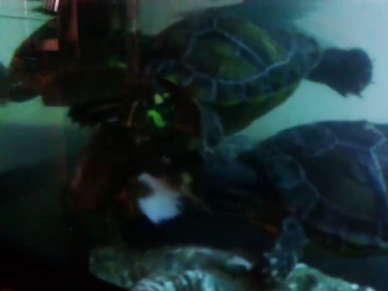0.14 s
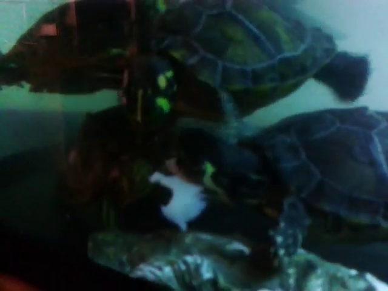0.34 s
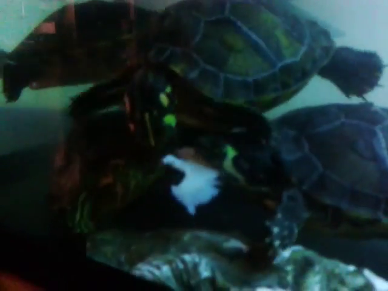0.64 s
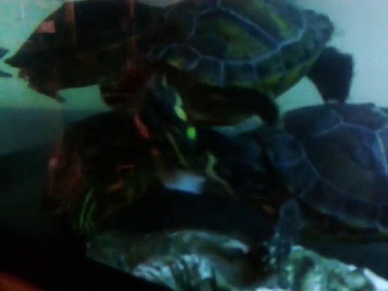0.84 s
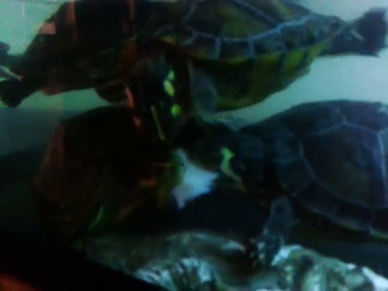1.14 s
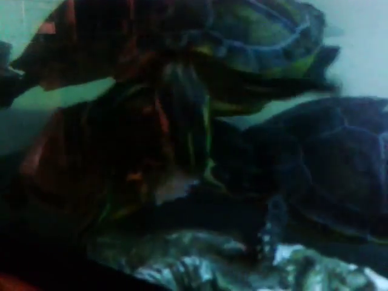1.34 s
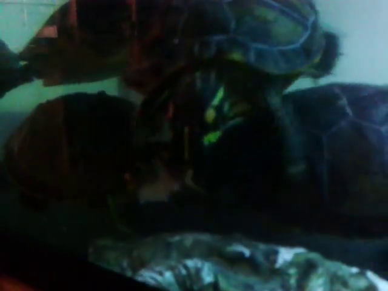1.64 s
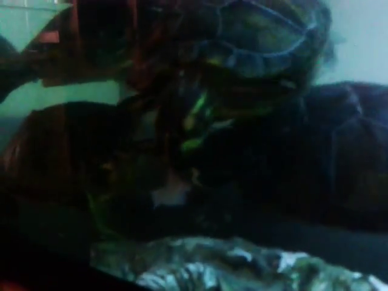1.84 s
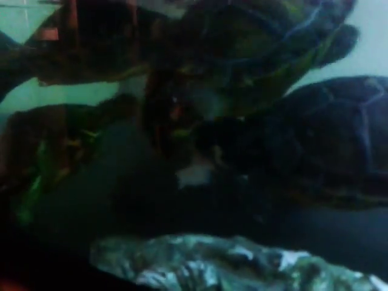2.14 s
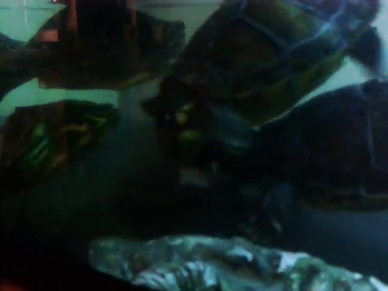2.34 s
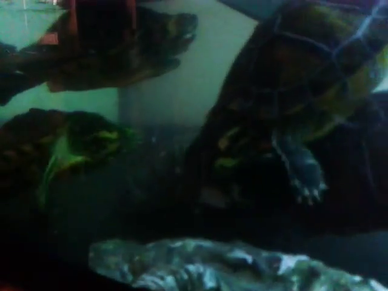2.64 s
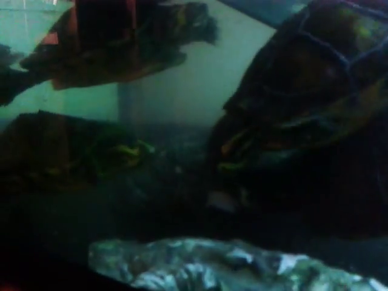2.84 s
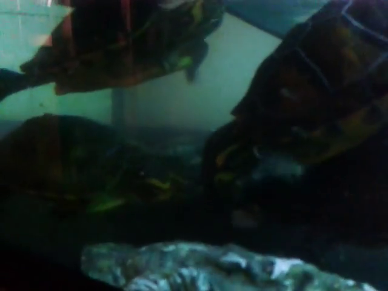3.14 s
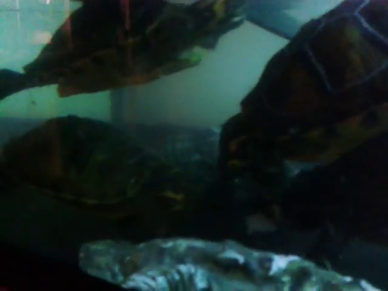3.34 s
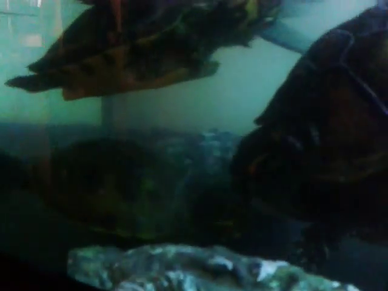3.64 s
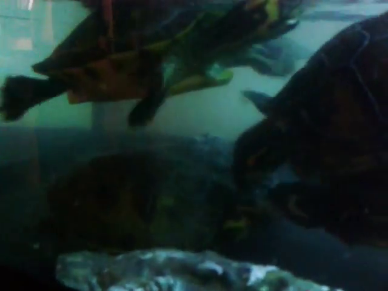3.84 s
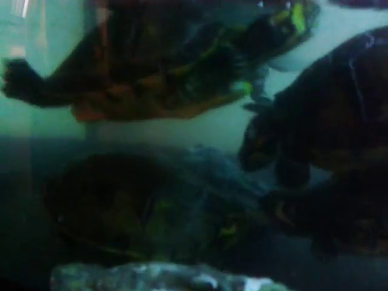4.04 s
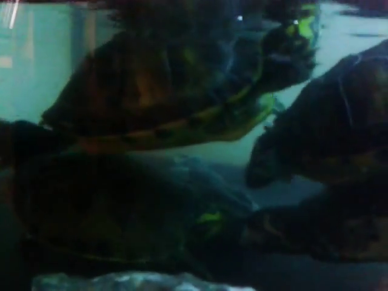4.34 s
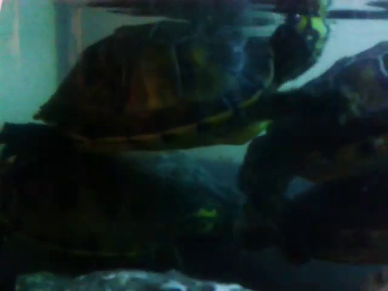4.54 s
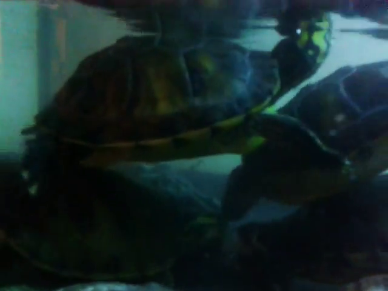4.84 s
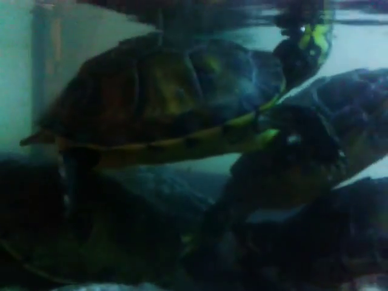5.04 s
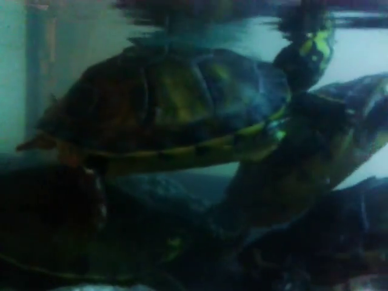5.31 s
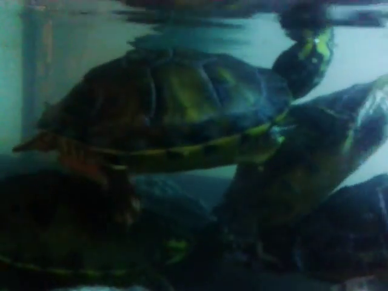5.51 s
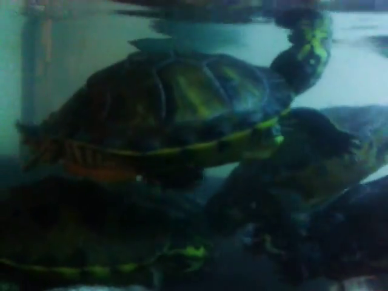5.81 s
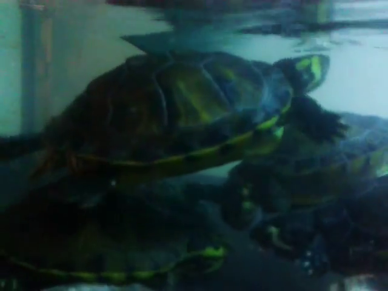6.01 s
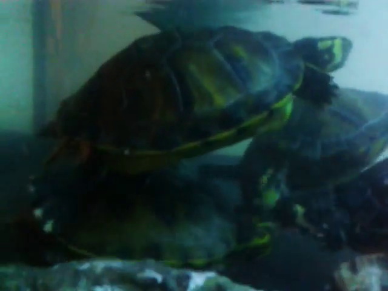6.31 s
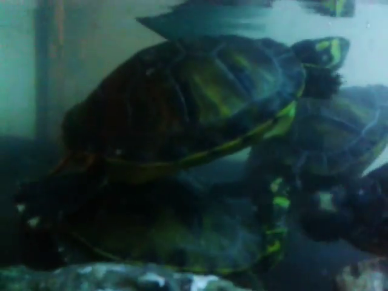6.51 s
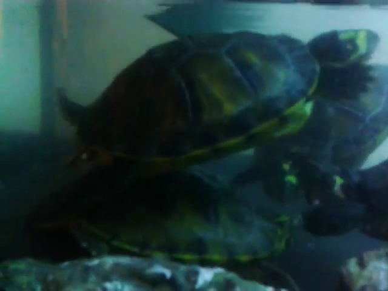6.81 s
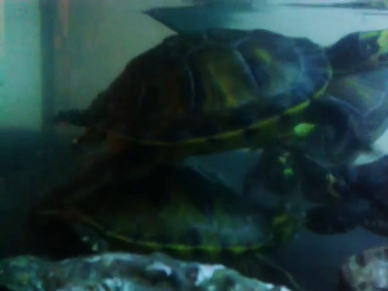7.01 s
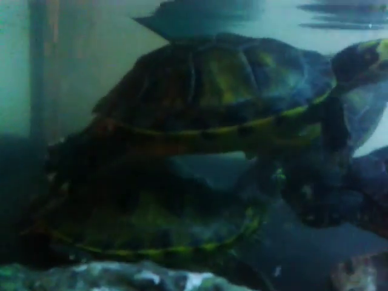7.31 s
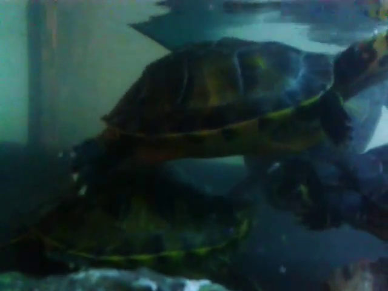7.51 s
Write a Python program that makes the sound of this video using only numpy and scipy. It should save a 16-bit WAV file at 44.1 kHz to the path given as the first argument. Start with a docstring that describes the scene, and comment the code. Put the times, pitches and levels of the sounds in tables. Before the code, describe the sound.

Close irregular taps, scrapes and clicks of turtle shells and claws on tank glass, two loud knocks echoing briefly, faint hiss around them.

```python
"""In a quiet room, turtles jostle in a glass aquarium close to the microphone.
Claws rasp (bursts of tiny clicks) and shells drag (low noise); light taps are short thuds of falling pitch.
Two hard knocks set the whole tank ringing (a sum of fading tones) and the room answers with noise-like echo.
Narrow bands of noise make rubs and fill out a tap and the knocks; a few squeaks are wavering tones.
A noise suppressor lets a faint hiss swell with each sound and sink after it."""
import sys
import numpy as np
from scipy import signal
from scipy.fft import rfft, irfft
from scipy.io import wavfile
from scipy.ndimage import uniform_filter1d

SR = 44100
rng = np.random.default_rng(int(sys.argv[2]) if len(sys.argv) > 2 else 0)


def output_pcm(signal):
    """Save a mono or channel-first signal as 16-bit PCM at the path in sys.argv[1].

    Samples are clipped to [-1, 1] before scaling.
    """
    pcm = np.clip(np.atleast_2d(signal).T, -1, 1) * 32767
    wavfile.write(sys.argv[1], SR, np.round(pcm).astype(np.int16))


N = 337806
TIME = np.arange(N) / SR
RING_TIME = np.arange(SR // 2) / SR  # half a second, the longest that one tap or knock lasts before its echo

# A t60 is the time in which a sound falls by 60 dB. Spectra give only a shape; the level is set elsewhere.
# The quiet room. Each row: frequency in Hz, relative strength in dB per Hz.
ROOM_TONE = [(20, -20), (45, -14.5), (85, -1), (125, 1), (200, -4.5), (320, -15.5), (600, -20),
             (1200, -32.5), (3000, -27.5), (9000, -51)]
# Microphone hiss. Each row: frequency in Hz, relative strength in dB per Hz.
HISS = [(30, -2.5), (300, 8.5), (1000, 2.5), (3000, 1), (5500, 4), (7800, 1), (8270, 4), (8700, 0.5),
        (11000, 1), (16000, 2.5)]
# How restless the turtles are. Each row: time in seconds, activity in dB (its contrast is stretched later).
RESTLESS = [(0.0, -74), (1.06, -70), (1.21, -66), (1.36, -65), (1.64, -73), (2.0, -74), (2.41, -60.5),
            (2.51, -67), (3.45, -73.5), (3.68, -61), (4.24, -69), (4.5, -66), (4.62, -63), (5.5, -70),
            (5.86, -64.5), (5.99, -67.5), (7.37, -76.5), (7.65, -78)]
# The rasp of a claw. Each row: frequency in Hz, relative strength in dB.
RASP = [(300, -42.5), (1100, -19.5), (1500, -11), (1900, -15.5), (2600, -15), (3300, -10.5), (4050, -10),
        (4550, 3), (5300, 4.5), (6300, 1.5), (7400, -4.5), (8500, -8.5), (10000, -20), (16000, -36)]
# The drag of a shell. Each row: frequency in Hz, relative strength in dB.
DRAG = [(60, -33.5), (170, 4), (280, 5.5), (450, 2), (650, -2), (900, -8), (1500, -20.5), (3000, -31),
        (8000, -44)]
# The room's echo. Each row: frequency in Hz, t60 in seconds.
ECHO = [(150, 0.63), (500, 0.37), (1500, 0.39), (5000, 0.38), (10000, 0.64)]
# Light contacts stay mostly in the glass. Each row: frequency in Hz, echo against the direct sound in dB.
LIGHT_ECHO = [(200, -10.0), (700, -34), (5000, -12.5)]
# How strongly a hard knock radiates into the room. Each row: frequency in Hz, relative strength in dB.
KNOCK_ECHO = [(200, -11), (450, -12.5), (750, -7), (1300, -16), (3000, -7.5), (5500, -3.5), (8000, 3.5)]
# Modes of the tank. Each row: frequency in Hz, t60 in seconds,
# relative level in dB when struck with the shell edge, and the same when struck flat on.
TANK_MODES = [(189, 0.5, -49, -58), (359, 0.13, -38, -40), (444, 0.15, -37, -39), (487, 0.11, -32, -19),
              (552, 0.17, -40, -34), (600, 0.12, -42, -34), (691, 0.26, -38, -48), (720, 0.24, -40, -40),
              (777, 0.26, -40, -36), (861, 0.15, -51, -35), (980, 0.14, -45, -32), (1049, 0.23, -51, -37),
              (1176, 0.21, -50, -38), (1270, 0.13, -48, -25), (1309, 0.19, -47, -29),
              (1553, 0.19, -43, -42), (1609, 0.17, -42, -43), (1657, 0.2, -43, -49), (1702, 0.12, -44, -36),
              (1776, 0.21, -53, -43), (1886, 0.24, -51, -45), (2171, 0.19, -55, -36),
              (2356, 0.17, -51, -50), (2686, 0.13, -43, -48), (2863, 0.13, -42, -46),
              (2968, 0.13, -39, -50), (3067, 0.13, -45, -45), (3171, 0.13, -42, -49),
              (3347, 0.13, -45, -53), (3682, 0.13, -56, -52)]
# A hard contact on glass. Each row: frequency in Hz, relative strength in dB.
CRACK = [(150, -36), (350, -12), (600, -2.5), (1300, 5.5), (1900, -4.5), (2300, -2), (3000, -11.5),
         (3900, -17.5), (4500, -9.5), (5500, -11), (6600, -24), (9000, -43), (16000, -71.5)]
# The first snap of a claw on the pane. Each row: frequency in Hz, relative strength in dB.
TICK = [(1000, -21.5), (3500, -16), (4600, -12.5), (6000, 7.5), (7000, -12), (8500, -19.5), (11000, -32)]
# Taps of shell and claw. Each row: start in seconds, thud level in dB, final thud pitch in Hz, thud t60 in
# seconds, tick level in dB, shake given to the tank in dB, crack level in dB.
TAPS = [(0.303, -42, 326, 0.014, -57, -26.5, -45), (0.7071, -46, 578, 0.126, -52, -32, -62),
        (1.016, -70, 496, 0.026, -32.5, -34, -62), (1.238, -52, 790, .04, -56, -29, -53),
        (1.475, -42, 440, 0.074, -65, -16, -32.5), (1.578, -49.5, 540, 0.097, -60, -29.5, -49),
        (2.2043, -36, 396, 0.072, -35, -14.5, -41), (2.3581, -31.5, 610, 0.021, -22, -37, -45.5),
        (2.961, -34.5, 590, 0.0078, -44, -24.5, -37), (3.1818, -34, 307, 0.047, -58.5, -30, -35),
        (3.186, -36, 900, 0.014, -58, -40, -48), (3.249, -43.5, 700, 0.0124, -60, -37.5, -58),
        (3.405, -49, 706, 0.0037, -25.5, -32, -42.5), (3.557, -45, 515, 0.013, -30, -19.5, -43.5),
        (3.729, -52, 636, 0.06, -44, -40, -41), (3.8519, -45.5, 510, 0.077, -40, -20.5, -38.5),
        (3.914, -49, 650, .004, -38.5, -39, -36.5), (4.183, -41, 553, 0.039, -28.5, -23, -31.5),
        (4.6902, -24.5, 450, 0.0025, -32, -29, -39.5), (4.891, -62.5, 700, 0.0068, -39, -35.5, -47),
        (5.9825, -36, 435.4, 0.027, -27, -30, -45), (6.212, -24.5, 415, 0.0067, -22, -29, -36),
        (6.2513, -12, 442, 0.00463, -13.5, -37.5, -30), (7.239, -44.5, 495.6, .021, -45, -36, -38.5),
        (7.307, -49, 466, .02, -52, -43, -50), (7.5518, -37.5, 380, 0.018, -28, -28, -53),
        (7.576, -46, 605, 0.0049, -58, -40, -55)]
# Firm strokes of claw and shell. Each row: start in seconds, length in seconds, rasp level in dB,
# rasp brightness in dB per octave, low drag level in dB.
STROKES = [(0.621, 0.047, -49.5, -1, -63), (0.694, 0.028, -58.5, -3, -60.5),
           (1.011, 0.0285, -50, -2, -62.5), (1.05, 0.084, -60, 0, -62), (1.105, 0.018, -40.5, 2.5, -70.5),
           (1.23, 0.024, -55, -4, -59), (1.316, 0.08, -52, 5, -68), (1.993, 0.029, -51.5, 4, -63.5),
           (2.056, 0.082, -79, -2, -59), (2.38, 0.022, -36.5, 5.5, -66), (2.605, 0.012, -52, -6.5, -65.5),
           (2.743, 0.097, -52, 1, -66), (3.045, 0.0068, -50.5, 3, -73), (3.08, 0.045, -50, 0, -64),
           (3.477, .047, -43.5, 1, -61.5), (3.667, 0.029, -51.5, -4, -69),
           (3.702, 0.0062, -38.5, -6.5, -75), (3.716, 0.025, -46, -11.5, -72.5),
           (3.744, 0.15, -55, -10, -59), (4.482, 0.065, -51, -6.5, -67), (4.572, 0.048, -46.5, -3.5, -65.5),
           (4.628, 0.052, -45.5, -6.5, -74), (4.986, 0.042, -57.5, 2, -70), (5.059, .045, -59.5, -6, -53.5),
           (5.581, 0.1, -55.5, 2.5, -69), (5.652, 0.075, -56, -4.5, -69.5),
           (5.784, 0.085, -53.5, -4.5, -64), (6.002, 0.08, -59.5, 0, -82), (6.202, 0.052, -60, -6, -53.5),
           (6.278, 0.092, -59, -1, -63.5)]
# Narrow noise bands: rubs on the glass, plus bands of the tap at 2.2 s, of the first knock,
# and a faint low ring after the second. Each row: start in seconds, length in seconds, level in dB,
# centre in Hz, width in Hz.
NARROW_BANDS = [(1.089, 0.055, -66, 1530, 200), (2.195, 0.065, -53, 740, 260), (2.23, .36, -60, 193, 45),
                (2.359, 0.022, -37.5, 3000, 696), (2.361, 0.0433, -45.5, 1650, 180),
                (3.479, 0.04, -54, 3460, 400), (3.665, 0.12, -57, 626, 100),
                (4.572, 0.11, -58.5, 3430, 600), (5.161, 0.68, -69, 260.6, 24.8),
                (5.81, 0.029, -59, 3387, 347), (6.63, 0.315, -59, 596, 257)]
# Hard knocks. Each row: start in seconds, gain on the tank's ring in dB, spot struck (0 shell edge, 1 flat on),
# crack level in dB, pitch in Hz that sets how bright the crack is, clatter level in dB,
# clatter t60 in seconds, gain on the room echo in dB.
KNOCKS = [(2.3602, -1.5, 0, -16, 647, -28, 0.0354, 9), (5.117, 0, 1, -7, 1428, -17.5, .035, -2)]
# Squeaks of a claw on wet glass, one list each. Each row: time in seconds, pitch in Hz, level in dB.
SQUEAKS = [
    [(2.744, 1290, -60), (2.748, 1044, -51.5), (2.765, 1030, -63), (2.79, 1004, -65)],
    [(2.81, 750, -59), (2.828, 774, -63), (2.845, 1120, -62), (2.854, 1580, -50.5), (2.864, 1946, -54),
     (2.873, 2130, -63), (2.88, 2250, -66)],
    [(3.616, 8150, -66), (3.62, 8700, -42), (3.626, 9000, -53), (3.64, 9100, -64)],
]

THUD_START_HZ, GLIDE_S = 937, 0.0016  # every thud glides from the same pitch to its own
RING_DB, SKID_DB = -6.5, -34.5  # shares of a tap's shake
SKID_RISE_S, SKID_T60_S = .006, 0.64  # the shell skids on briefly after it lands
# Noise suppressor: where cutting begins, how steeply it cuts, how fast it closes, the bass it spares
OPEN_DB, CUT_DB_PER_DB, CLOSE_DB_PER_S, SPARED_BASS_HZ = -50, 0.69, 45.5, 210
EDGE_HZ = 17350  # upper band limit


def amp(db):
    """Turns decibels into gain."""
    return 10 ** (np.asarray(db) / 20)


def unit(x):
    """Scales a sound to rms 1."""
    return x / np.sqrt(np.mean(x ** 2) + 1e-20)


def read(points, hz):
    """Reads a table of frequency and value, with straight lines over log frequency."""
    f, value = np.transpose(points)
    return np.interp(np.log(hz + 1), np.log(f + 1), value)


def add(mix, s, sound):
    """Mixes a sound in at time s, in seconds."""
    part = mix[max(round(s * SR), 0):][:len(sound)]
    part += sound[:len(part)]


def dying(t60):
    """Envelope that falls 60 dB in t60 seconds."""
    return amp(-60 * RING_TIME / max(t60, 1e-3))


def coloured(x, spectrum):
    """Gives noise a spectrum, at rms 1."""
    hz = np.fft.rfftfreq(len(x), 1 / SR)
    return unit(irfft(rfft(x) * amp(read(spectrum, hz)), len(x)))


def click(spectrum, tilt_db=0, centre_hz=5500, size=2048):
    """Sharp click of peak 1 that starts at once; its spectrum tilts over an octave each side of the centre."""
    hz = abs(np.fft.fftfreq(size, 1 / SR))
    octaves = np.clip(np.log2((hz + 1) / centre_hz), -1, 1)
    log_gain = np.log(amp(read(spectrum, hz) + tilt_db * octaves))
    # minimum phase packs the energy at the start
    pulse = np.fft.ifft(np.exp(np.conj(signal.hilbert(log_gain)))).real[:size // 2]
    return pulse / abs(pulse).max()


def background(tone_db=-71.5, hiss_db=-59.0):
    """Low room tone and steady microphone hiss, both shaped noise."""
    tone = amp(tone_db) * coloured(rng.standard_normal(N), ROOM_TONE)
    hiss = amp(hiss_db) * coloured(rng.standard_normal(N), HISS)
    return tone + hiss


def rasp(count, bright_db, slips_per_s=1800, slip_spread_db=3, place_t60=0.038, place_db=-21):
    """Many tiny slips of a claw on the pane, each a click, at rms 1."""
    slips = rng.standard_normal(count) * (rng.random(count) < slips_per_s / SR)
    slips *= amp(slip_spread_db * np.minimum(rng.exponential(1, count), 4))
    # reflections from the edges of the pane give each place of contact its own resonances
    reflections = rng.standard_normal(len(RING_TIME)) * dying(place_t60)
    slips += amp(place_db) * signal.fftconvolve(slips, reflections)[:count]
    return unit(signal.fftconvolve(slips, click(RASP, bright_db))[:count])


def scuffing(rasp_db=-62, drag_db=-68, busy_db=-65, contrast=1.4, bright_db=-2, fitful_db=2):
    """Feet and shells brush the glass in fits and starts, and almost fall silent when the turtles rest."""
    fits = unit(uniform_filter1d(rng.standard_normal(N), size=3000))
    activity_db = np.interp(TIME, *np.transpose(RESTLESS))
    pressure = amp(contrast * (activity_db - busy_db) + fitful_db * fits)
    claws = amp(rasp_db) * rasp(N, bright_db)
    shells = amp(drag_db) * coloured(rng.standard_normal(N), DRAG)
    return pressure * (claws + shells)


def radiated(x):
    """Little deep bass comes through, and the water damps the highest treble."""
    return signal.sosfilt(signal.butter(4, [165, 9000], "bandpass", fs=SR, output="sos"), x)


def room(x, colour, build_s=0.01):
    """Diffuse echo, made of noise, that builds up quickly while each band dies at its own speed."""
    hz, t, bands = signal.stft(rng.standard_normal(len(RING_TIME)), SR, nperseg=256)
    bands = bands * amp(-60 * t / read(ECHO, hz)[:, None])
    tint = amp(read(colour, hz))[:, None]
    swell = 1 - np.exp(-RING_TIME / build_s)
    plain = signal.istft(bands, SR, nperseg=256)[1][:len(RING_TIME)] * swell
    tinted = signal.istft(bands * tint, SR, nperseg=256)[1][:len(RING_TIME)] * swell
    # scaled by the plain echo, so the colour also sets the echo's level
    return signal.fftconvolve(x, tinted / np.linalg.norm(plain))[:N]


def ring(spot, spread_db=0):
    """The tank's modes as fading tones; where the blow lands decides how strongly each one sounds."""
    out = np.zeros(len(RING_TIME))
    chances = rng.standard_normal((len(TANK_MODES), 2))
    for (hz, t60, edge_db, flat_db), (turn, luck) in zip(TANK_MODES, chances):
        db = np.interp(spot, [0, 1], [edge_db, flat_db]) + spread_db * luck
        out += amp(db) * dying(t60) * np.sin(2 * np.pi * (hz * RING_TIME + turn))
    return out * (1 - np.exp(-RING_TIME / 0.0036))  # soft onset


def tap(thud_db, last_hz, t60, tick_db, shake_db, crack_db, rise_s=.0001, tick_t60=.01, crack_tilt_db=-1):
    """Bending waves in water-loaded glass: a sharp tick and crack, a gliding thud, a ring and a skid."""
    t = RING_TIME
    # treble travels faster through the pane, so the thud's pitch glides
    hz = last_hz + (THUD_START_HZ - last_hz) * np.exp(-t / GLIDE_S)
    thud = np.sin(2 * np.pi * np.cumsum(hz) / SR) * dying(t60) * (1 - np.exp(-t / rise_s))
    tick = coloured(rng.standard_normal(len(t)), TICK)
    tick *= dying(tick_t60) / abs(tick).max()
    skid = coloured(rng.standard_normal(len(t)), DRAG)
    skid *= dying(SKID_T60_S) * (1 - np.exp(-t / SKID_RISE_S))
    shake = amp(RING_DB) * ring(.37, spread_db=4) + amp(SKID_DB) * skid
    out = amp(thud_db) * thud + amp(tick_db) * tick + amp(shake_db) * shake
    add(out, 0, amp(crack_db) * click(CRACK, crack_tilt_db, centre_hz=1520))
    return out


def taps():
    """The distinct taps of shell and claw, each making the water-loaded pane bend and ring."""
    out = np.zeros(N)
    for s, *blow in TAPS:
        add(out, s, tap(*blow))
    return out


def strokes(rise_share=0.32, release_s=.0068, uneven_db=2.5):
    """Pressure builds, holds unevenly and lets go; the claw rasps while the heavy shell drags lower down."""
    out, t, count = np.zeros(N), RING_TIME, len(RING_TIME)
    for s, length, rasp_db, bright_db, drag_db in STROKES:
        build = 1 - np.exp(-t / (rise_share * length))
        release = np.exp(-np.maximum(t - length, 0) / release_s)
        unevenness = unit(uniform_filter1d(rng.standard_normal(count), size=400))
        pressure = build * release * amp(uneven_db * unevenness)
        drag = coloured(rng.standard_normal(count), DRAG)
        add(out, s, pressure * (amp(rasp_db) * rasp(count, bright_db) + amp(drag_db) * drag))
    return out


def narrow_bands():
    """Band-filtered noise with soft ends: rubs on the glass, and bands that fill out a tap and the knocks."""
    out = np.zeros(N)
    for s, length, db, hz, width_hz in NARROW_BANDS:
        edges = [hz - width_hz / 2, hz + width_hz / 2]
        band = signal.butter(2, edges, "bandpass", fs=SR, output="sos")
        # keep only the end, when the filter has settled
        noise = signal.sosfilt(band, rng.standard_normal(SR))[-round(length * SR):]
        add(out, s, amp(db) * unit(noise) * signal.windows.tukey(len(noise), .6))
    return out


def knocks(glass_hz=1350, soft_db=9):
    """A crack, a clatter of waves crossing the panes, the ring and the room's answer; blunt blows are duller."""
    direct, into_room = np.zeros(N), np.zeros(N)
    for s, ring_db, spot, crack_db, hz, clatter_db, clatter_t60, echo_db in KNOCKS:
        crack = click(CRACK, soft_db * np.log2(hz / glass_hz), centre_hz=700)
        clatter = unit(signal.fftconvolve(rng.standard_normal(len(RING_TIME)), crack, "same"))
        knock = amp(ring_db) * ring(spot)
        add(knock, 0, amp(crack_db) * crack)
        add(knock, .001, amp(clatter_db) * clatter * dying(clatter_t60))
        add(direct, s, knock)
        add(into_room, s, amp(echo_db) * knock)
    return radiated(direct) + room(radiated(into_room), KNOCK_ECHO, build_s=0.035)


def squeaks(jitter=0.067):
    """Stick and slip falls into an unsteady tone that follows the claw's speed."""
    out = np.zeros(N)
    for rows in SQUEAKS:
        s, hz, db = np.transpose(rows)
        t = np.arange(s[0], s[-1], 1 / SR)
        waver = 1 + jitter * unit(uniform_filter1d(rng.standard_normal(N), size=40))[:len(t)]
        pitch = np.interp(t, s, hz) * waver
        tone = unit(np.sin(2 * np.pi * np.cumsum(pitch) / SR))
        add(out, s[0], amp(np.interp(t, s, db)) * tone)
    return out


def suppressed(x):
    """Turns down all but the bass when it is quiet; opens quickly and closes slowly, so the hiss swells and sinks."""
    power = uniform_filter1d(radiated(x) ** 2, size=300)
    level_db = 10 * np.log10(abs(power) + 1e-12)
    wanted_db = CUT_DB_PER_DB * np.minimum(level_db - OPEN_DB, 0)
    # a running maximum on a rising ramp lets the gain fall no faster than the ramp rises
    closing = CLOSE_DB_PER_S * TIME
    gain_db = np.maximum.accumulate(wanted_db + closing) - closing
    gain_db = uniform_filter1d(gain_db, size=400)
    bass = signal.sosfiltfilt(signal.butter(1, SPARED_BASS_HZ, fs=SR, output="sos"), x)
    return bass + amp(gain_db) * (x - bass)


def scene():
    """Everything that the turtles do to the glass, its echo in the room, and the background."""
    light = radiated(taps() + strokes() + scuffing() + narrow_bands() + squeaks())
    light_echo = room(light, LIGHT_ECHO, build_s=.012)
    return (knocks() + light + light_echo + background())[None]


def record(dry):
    """The noise suppressor, then a filter that cuts everything above the band limit."""
    band_limit = signal.firwin(511, EDGE_HZ, window=("kaiser", 9), fs=SR)
    return signal.oaconvolve(suppressed(dry[0]), band_limit, "same")[None]


dry = scene()
out = record(dry)
output_pcm(out)
```